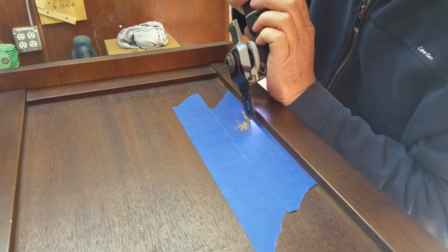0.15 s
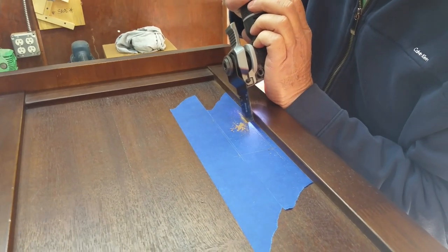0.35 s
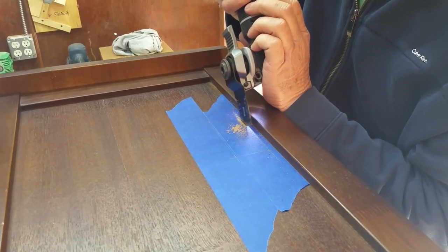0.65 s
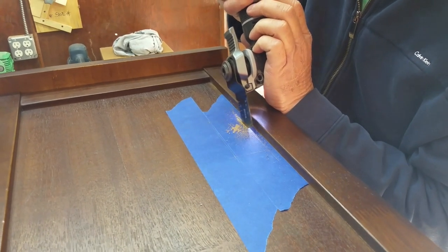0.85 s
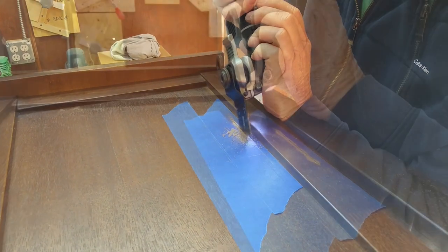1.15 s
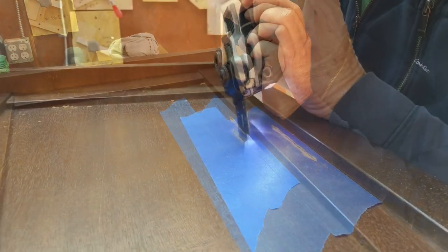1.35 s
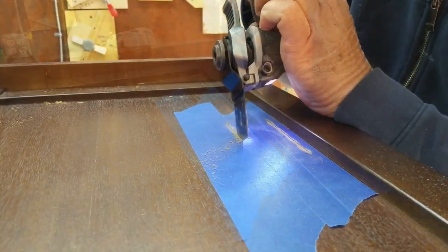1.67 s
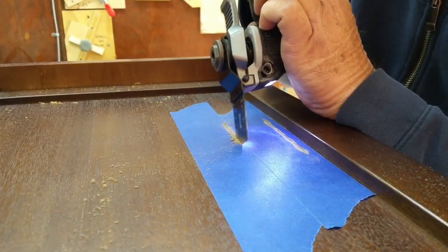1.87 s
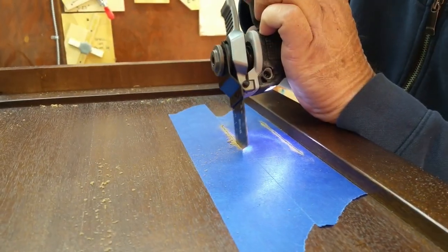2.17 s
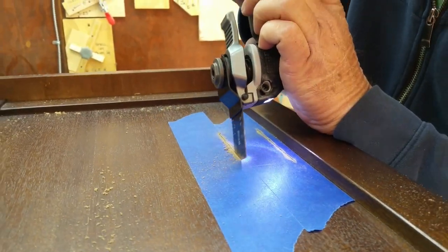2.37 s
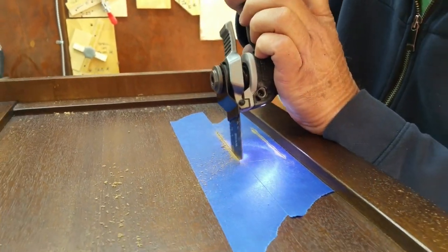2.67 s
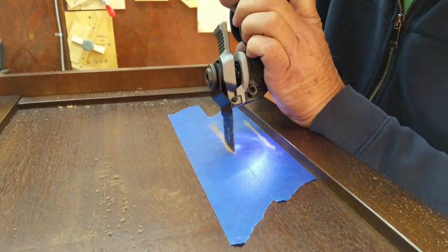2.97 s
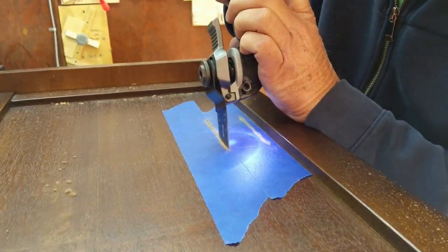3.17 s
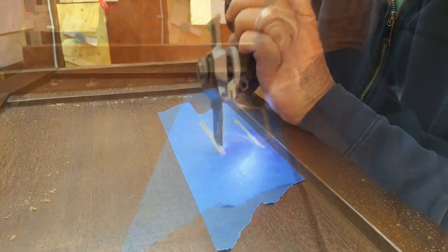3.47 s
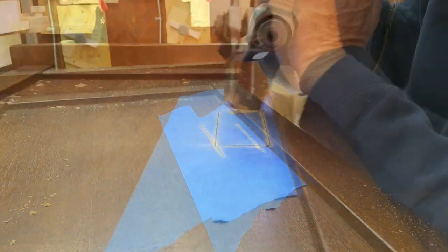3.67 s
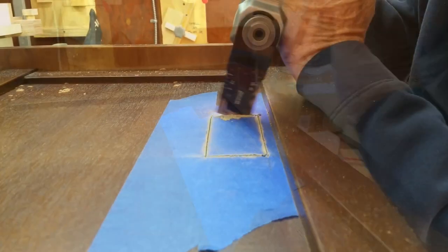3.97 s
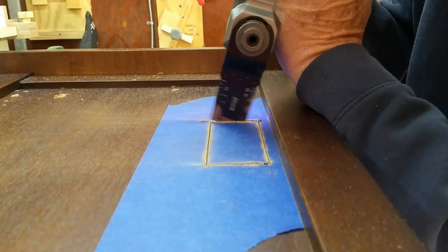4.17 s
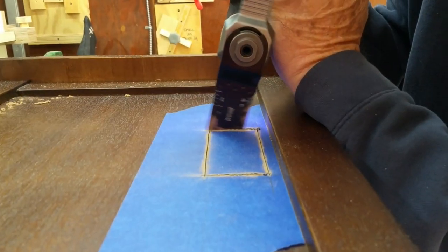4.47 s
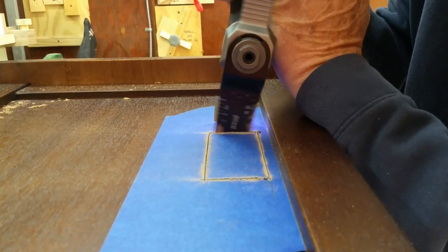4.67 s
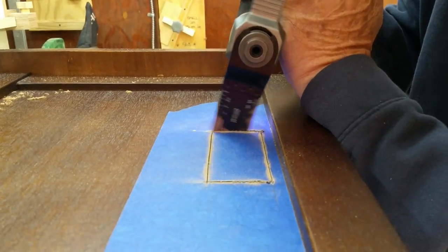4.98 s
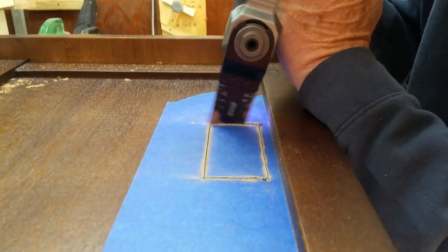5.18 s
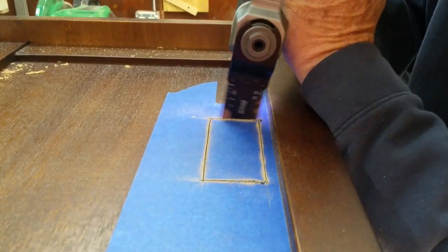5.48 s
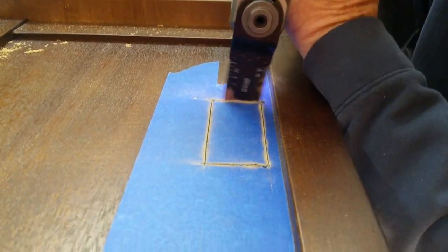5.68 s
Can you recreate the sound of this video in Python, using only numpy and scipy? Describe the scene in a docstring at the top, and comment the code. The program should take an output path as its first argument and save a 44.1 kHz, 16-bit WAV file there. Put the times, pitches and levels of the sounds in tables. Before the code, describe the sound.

A close stereo sound of an oscillating saw cutting a thin veneered wooden panel in a small workshop. From 0 s a shrill, steady buzzing whine with a fast, roughly constant pitch is heard; by about 0.2 s hissing, gritty grinding joins and grows. Between 1 and 1.8 s the first cut fades into a second, with deeper panel hum and stronger rasp. Brief chatter roughens it near 2.1 and 2.7 s, most strongly at 3.1-3.35 s as a harsh rattling buzz. Around 3.4 s the load drops and the whine clears, while a third cut fades in until 4 s. It bites hard, with growling hum, chatter around 3.8-4.2 s and small woody snags at 4.4 and 4.6 s. After 4.65 s the pitch rises slightly and the blade runs freer, a bright wavering whine with light, uneven hiss. It continues to the end, about 5.8 s, without winding down.

```python
"""A shrill, buzzing whine is heard first, then grinding joins: an oscillating saw plunges into a veneered panel
in a small workshop, in three cuts, each fading into the next. About 347 swings a second, two strokes a swing,
make a harmonic series led by even orders; the panel hums the low orders under load. Noise pulsing with the
strokes is the grinding teeth, sidebands are the panel chattering at a rate of its own, and decaying modes
struck by clicks are snags; a low noise band is the panel rumble."""
import sys
import numpy as np
from scipy import signal
from scipy.fft import rfft, irfft, next_fast_len
from scipy.io import wavfile

SR = 44100
rng = np.random.default_rng(int(sys.argv[2]) if len(sys.argv) > 2 else 0)


def to_wav(s):
    """Save 16-bit WAV."""
    ch = np.atleast_2d(s).T  # columns
    pcm = np.round(np.clip(ch, -1, 1) * 32767)  # PCM
    wavfile.write(sys.argv[1], SR, pcm.astype(np.int16))


N = 257103
STEP = 32   # samples between points of a slow control

# Motion and load of the blade in each cut, before the fades; the swing sags and the panel hums as it bites:
# (time [s], swing rate [Hz], order 1 [dB], panel hum in order 2 [dB], blade buzz in order 6 [dB],
# head whine in the even orders from 16 [dB])
CUT_1 = [(0, 350.4, -57.5, -44.5, -36, -30), (.16, 351.2, -56, -51, -38, -32),
         (.25, 349.7, -53, -60.5, -43, -31.5), (.35, 351.8, -49, -55, -43.5, -31),
         (.65, 348.9, -47.5, -44, -32, -25.5), (.76, 346.3, -61, -38.5, -34, -25.5),
         (.85, 347.4, -45.5, -38.5, -32.5, -28.5), (.92, 346.8, -47.5, -35.5, -38.5, -30),
         (1.11, 348, -47.5, -38, -39, -29), (1.26, 347.9, -47.5, -30.5, -43, -27),
         (1.39, 349.3, -45.5, -30.5, -52, -28), (1.52, 350.9, -53, -30.5, -48, -25),
         (1.8, 347.2, -49.5, -28.5, -46, -24)]
CUT_2 = [(1.0, 348.6, -40, -42.5, -50.5, -15.5), (1.28, 345.7, -41.5, -43, -37.5, -24.5),
         (1.422, 346.9, -46, -36.5, -34, -27), (1.531, 346.1, -52, -42, -37, -30),
         (1.75, 342.6, -54, -35, -37.5, -31), (1.86, 344.4, -49, -34, -34.5, -30.5),
         (1.939, 342.9, -55, -32.5, -34, -30), (2.06, 346.6, -48.5, -34, -34.5, -29.5),
         (2.12, 345.6, -51, -34.5, -34.5, -28.5), (2.3, 346, -52, -36.5, -35, -27.5),
         (2.389, 345, -52.5, -40.5, -34, -26.5), (2.54, 347.2, -59.5, -39, -37, -26.5),
         (2.63, 346.4, -51.5, -37.5, -35, -32.5), (2.741, 347.4, -53.5, -32.5, -33, -32),
         (2.83, 346.6, -46, -27.5, -37.5, -30), (2.979, 345.7, -45.5, -28.5, -37.5, -33.5),
         (3.13, 345.9, -45, -33, -42, -31), (3.19, 347, -85, -35, -38, -33),
         (3.289, 345.1, -63, -31.5, -51.5, -35.5), (3.37, 351.8, -58.5, -46.5, -59, -31),
         (3.47, 352.2, -59.5, -49, -51.5, -30.5), (3.53, 348, -83.5, -56.5, -49, -34),
         (3.62, 351.2, -75, -61.5, -51, -26.5), (4.049, 356.9, -61.5, -52.5, -33.5, -27)]
CUT_3 = [(3.3, 340.7, -51, -38, -29, -16.5), (3.549, 335.2, -62, -43, -42.5, -32),
         (3.68, 344.8, -63, -51.5, -35.5, -38.5), (3.759, 341.4, -56.5, -32.5, -30.5, -30.5),
         (3.869, 345, -55.5, -31.5, -37, -29.5), (4.089, 344.4, -60.5, -32.5, -30.5, -34),
         (4.19, 339.9, -44.5, -41.5, -33, -28.5), (4.28, 342.4, -45.5, -37, -34, -31.5),
         (4.35, 339.1, -62, -25.5, -35, -30), (4.41, 335.7, -78, -33, -40, -30),
         (4.501, 339.4, -73.5, -35.5, -44, -30), (4.601, 337.8, -85, -33, -29, -27),
         (4.625, 346.1, -76, -49, -41, -31), (4.66, 351.4, -65.5, -56, -42, -30.5),
         (4.92, 347.3, -71.5, -48, -45, -24.5), (5.04, 350.3, -65.5, -49.5, -42, -30),
         (5.129, 351.7, -75.5, -55, -42, -27.5), (5.29, 348.6, -57, -53, -41, -29),
         (5.409, 352, -69.5, -56, -39.5, -28.5), (5.499, 347.4, -62, -51.5, -45.5, -28.5),
         (5.56, 350.9, -70, -53, -38.5, -26.5), (5.629, 347.6, -67, -47, -44, -25),
         (5.689, 350.8, -67.5, -49, -47, -25.5), (5.83, 345.9, -100.5, -50, -41, -26)]
# Level of the other orders, whichever cut sounds: (time [s], order 4 [dB], order 8 [dB], order 12 [dB],
# orders 10 and 14 [dB], odd orders 3-13 [dB], odd orders 15-45 [dB])
MIDDLE = [(0, -52.5, -29, -44, -47.5, -47, -35), (0.12, -49, -33.5, -51, -40, -46, -35.5),
          (0.3, -44.5, -43.5, -48, -46.5, -49, -33), (0.45, -41.5, -45, -41, -41, -43, -28.5),
          (0.6, -42, -39.5, -41.5, -43.5, -42, -34.5), (0.75, -46, -45.5, -39.5, -40.5, -55.5, -39.5),
          (0.9, -40.5, -37.5, -38.5, -41, -49, -37.5), (1.05, -42.5, -38.5, -38, -37, -46, -30.5),
          (1.23, -45, -34.5, -39.0, -33.5, -39.5, -39.0), (1.4, -42.5, -37, -38, -42.5, -38.5, -39.5),
          (1.55, -40, -34, -39, -37, -43.5, -44.5), (1.75, -45.5, -37.5, -45, -42, -43, -39.5),
          (1.9, -47, -38.5, -40.0, -39.5, -45, -39.5), (2.05, -44.5, -42.5, -42, -42, -43, -36.5),
          (2.2, -44, -45.5, -40, -48.5, -43.5, -36.5), (2.34, -46.5, -36.5, -40.5, -39, -39, -31.5),
          (2.48, -42, -40.5, -42.5, -41.5, -42, -42.5), (2.58, -43.5, -45, -38.5, -43.5, -33.5, -29.5),
          (2.7, -38, -36.5, -39, -37.5, -39.0, -32.5), (2.84, -44, -39.5, -41.5, -37.5, -32.5, -32.0),
          (3, -41.0, -41, -42.5, -39.5, -38, -29.5), (3.13, -34, -37, -38.5, -46, -32.5, -33.5),
          (3.25, -39.5, -40.5, -54.5, -41.5, -50.5, -34), (3.36, -47, -49, -39.5, -43, -52, -41.5),
          (3.45, -46, -44, -44, -44.5, -48.5, -36.5), (3.55, -57.5, -51, -45, -51, -50, -33.5),
          (3.68, -52.0, -50, -49, -38, -43.5, -38), (3.77, -40.5, -39, -47.5, -47, -43.5, -40),
          (3.9, -39, -38.5, -35.5, -42, -48.5, -36.5), (4.06, -37.5, -36.0, -39.5, -43.5, -40, -30),
          (4.14, -39, -36, -40, -41.5, -43.5, -35.5), (4.2, -35.5, -34.5, -38, -38.5, -38.5, -31),
          (4.31, -37, -39, -43, -35, -35, -32), (4.38, -33, -44.5, -29.5, -28.5, -40.5, -34),
          (4.45, -35.0, -39.5, -30.5, -36.5, -62, -36.5), (4.58, -37.5, -39.5, -34, -31.5, -61, -39.5),
          (4.66, -59, -49.5, -48, -42, -44, -39), (4.8, -53.5, -42, -35, -36, -43.5, -34),
          (4.96, -43.5, -37.5, -35, -35, -47, -40.5), (5.05, -67.5, -53, -48, -43, -49, -36.5),
          (5.13, -58.5, -42, -58.5, -43, -43.5, -33.5), (5.22, -51, -44.5, -46.5, -40, -43.5, -38.5),
          (5.3, -40, -35, -40.5, -36, -44, -35.5), (5.38, -49, -37.5, -40.0, -38.5, -42, -34.5),
          (5.45, -57, -51, -34.5, -36.5, -42.5, -32), (5.55, -53.5, -40, -37.5, -35.0, -46, -32.5),
          (5.64, -48, -44, -39.5, -30.5, -48.5, -37), (5.74, -49, -41.5, -48, -34.5, -60.5, -34),
          (5.83, -44, -34.5, -44.5, -31.5, -51.0, -31)]
# Orders sharing each level column, those of the cut first, then those of MIDDLE: [order numbers]
GROUPS = [
    [1],
    [2],
    [6],
    range(16, 46, 2),
    [4],
    [8],
    [12],
    [10, 14],
    range(3, 15, 2),
    range(15, 46, 2),
]
# Colour of head and blade within those groups, one table a cut: (order, relative level [dB])
COLOUR_1 = [(1, -14), (2, -7), (3, -25.5), (4, -9), (5, -31), (6, -2), (7, -23.5), (8, -18), (9, -16),
            (10, -21), (11, -23), (12, -12.5), (13, -26.5), (14, -18.5), (15, -35.5), (16, -5), (17, -18.5),
            (18, 0), (19, -20.5), (20, -1.5), (21, -14), (22, -2), (23, -8.5), (24, -4), (25, -6.5),
            (26, -12.5), (27, -14.5), (28, -12.5), (29, -25), (30, -12.5), (31, -18), (32, -9.5),
            (33, -12.5), (34, -12.5), (35, -17.5), (36, -10.5), (37, -26), (38, -11.5), (39, -22.5),
            (40, -14.5), (41, -26.5), (42, -7), (43, -22), (44, -22.5), (45, -33.5)]
COLOUR_2 = [(1, -17), (2, 0), (3, -23), (4, -10), (5, -17.5), (6, -3), (7, -13.5), (8, -13), (9, -7.5),
            (10, -18.5), (11, -17), (12, -16), (13, -20.5), (14, -21), (15, -13), (16, -8), (17, -21),
            (18, -8.5), (19, -9.5), (20, -2.5), (21, -14.5), (22, -8.5), (23, -10), (24, -5), (25, -10.5),
            (26, -8.5), (27, -16), (28, -9.5), (29, -17), (30, -10.5), (31, -18), (32, -1.5), (33, -23.5),
            (34, -15.5), (35, -20), (36, -15.5), (37, -14), (38, -14.5), (39, -12), (40, -11), (41, -28.5),
            (42, -16.5), (43, -24.5), (44, -13.5), (45, -24.5)]
COLOUR_3 = [(1, -18), (2, 0), (3, -27), (4, -3), (5, -26.5), (6, -1), (7, -22.5), (8, -7.5), (9, -14),
            (10, -9), (11, -24.5), (12, -10), (13, -21), (14, -15.5), (15, -11), (16, -7.5), (17, -19.5),
            (18, -12.5), (19, -7), (20, -6.5), (21, -13.5), (22, -13), (23, -23.5), (24, -13), (25, -7.5),
            (26, -10.5), (27, -13), (28, -12), (29, -10), (30, -17), (31, -13), (32, -13), (33, -14.5),
            (34, -12), (35, -18.5), (36, -23.5), (37, -18.5), (38, -14), (39, -14.5), (40, -9.5), (41, -17),
            (42, -20), (43, -20), (44, -19), (45, -19)]
# Colour once the blade is lifted and runs free: (order, relative level [dB])
COLOUR_FREE = [(1, -29), (2, -15), (3, -27.5), (4, -14), (5, -24.5), (6, -7), (7, -9), (8, -10.5), (9, -10),
               (10, -9), (11, -19), (12, -9.5), (13, -22.5), (14, -5), (15, -18), (16, -1.5), (17, -10.5),
               (18, -2), (19, -9), (20, 1), (21, -13), (22, -6), (23, -22.5), (24, -0.5), (25, -12),
               (26, -5), (27, -17.5), (28, -6), (29, -12.5), (30, -6.5), (31, -9.5), (32, -8), (33, -3),
               (34, -10), (35, -12.5), (36, -9), (37, -17.5), (38, -7.5), (39, -7), (40, -9), (41, -22.5),
               (42, -14), (43, -23), (44, -13), (45, -30.5)]
# When the blade leaves the wood, one entry a cut; a time past the end means never: (time [s])
LIFTED_S = [6, 3.35, 4.63]
# The tool is held differently each time, so some orders lag further at the right microphone (negative: less):
# (order, cut 1 [rad], cut 2 [rad], cut 3 [rad], running free [rad])
HELD = [(8, 1.074, 0.23, -.5, 0.0035), (12, 0.35, -0.41, -3, 2.02), (16, 1.54, 0.82, 1.82, 1.81),
        (18, -0.2, -0.14, -0.2, -2.5), (20, 0.8, -0.9, 0.68, 0.45)]
FREE_ROUGH = 0.55   # share of the flutter left when the blade runs free
# Least share of flutter: order 1 is only the mismatch of the two strokes, which never match for long
FIRST_SHRILL, ODD_SHRILL, EVEN_SHRILL = 0.55, 0.4, 0.33


def cut(rows, orders, number):
    """Harmonic series of a periodic motion: orders locked to one swing phase, roughened by load."""
    span = slice(round(rows[0][0] * SR), min(round(rows[-1][0] * SR), N))
    hz, *levels = [column[span] for column in in_time(rows)]
    size, mean_hz = len(hz), hz.mean()
    hunting_hz = 0.2386 * fill(drift(18.36, size), size)   # the motor hunts slightly
    turn = 2 * np.pi * np.cumsum(hz + hunting_hz) / SR
    # the hum of the panel tells how hard the blade bites
    load = np.clip((levels[1] + 58) / 22, FREE_ROUGH, 1)
    # strokes land early or late: skirts on high orders
    turn = turn + 0.011 * load * fill(drift(70, size), size)

    levels += [column[span] for column in in_time(MIDDLE)]
    slow_s = np.arange(span.start, span.stop)[::STEP] / SR
    lifted = np.clip((slow_s - LIFTED_S[number]) / 0.03, 0, 1)
    colour = {k: biting + (free - biting) * lifted
              for (k, biting), (_, free) in zip(orders, COLOUR_FREE)}
    line_db = {}
    for group, level_db in zip(GROUPS, levels):
        # power sum of the colour, so that it only shares out the group level
        total_db = 10 * np.log10(sum(from_db(colour[k]) ** 2 for k in group))
        for k in group:
            line_db[k] = level_db + fill(colour[k] - total_db, size)

    lifted = np.pad(lifted, (0, 2), "edge")[:size // STEP + 2]
    trails = {round(k): held[number] + (held[3] - held[number]) * lifted for k, *held in HELD}
    lines, swing, carrier = np.zeros((2, size)), np.exp(1j * turn), 1
    for k in sorted(line_db):
        carrier = carrier * swing   # one order higher
        if k % 2:
            least = ODD_SHRILL if k > 1 else FIRST_SHRILL
            lines += partial(carrier, k * mean_hz, line_db[k], wander_db=1.8, flutter_db=2.8,
                             wander_rad=0.6, load=load, least=least)
        else:
            lines += partial(carrier, k * mean_hz, line_db[k], wander_db=1.18, flutter_db=3.0,
                             wander_rad=0.666, load=load, least=EVEN_SHRILL, trail=trails.get(k, 0))
    for bout in CHATTER:
        # a bout belongs to the cut begun last
        if sum(later[0][0] < bout[0] for later in (CUT_2, CUT_3)) == number:
            lines += chatter_lines(bout, turn, span, mean_hz)
    return np.pad(lines, ((0, 0), (span.start, N - span.stop)))


# Level difference of the two microphones: (frequency [Hz], left minus right [dB])
BALANCE_DB = [(60, -13), (200, 5.5), (380, 1), (700, 1.5), (1290, 3.5), (2380, 1.5), (4400, 0.5), (8120, 0),
              (15000, -4.5)]
# Likeness of the two microphones: (frequency [Hz], left-right likeness [0-1])
LIKENESS = [(60, 1), (300, 0.994), (900, 0.876), (2000, 0.75), (5000, 0.201), (15000, 0.483)]
BLUR_FROM_HZ, BLUR_RAD_PER_KHZ = 8000, 0.11   # above this the lines smear ever more into rasp


def partial(carrier, hz, level_db, wander_db, flutter_db, wander_rad, load, least=0, trail=0):
    """Amplitude and phase modulation: slow chance broadens a line, partly apart at two microphones."""
    n = len(carrier)
    apart = np.sqrt(max(1 - at_hz(LIKENESS, hz), 0))
    shrill = max(min(hz / 4000, 1) ** 0.8, least)   # higher lines waver more
    level_db, load = [np.pad(c[::STEP], (0, 2), "edge")[:n // STEP + 2] for c in (level_db, load)]
    left_right = np.array([[0.5], [-0.5]])

    level_db = level_db + shrill * (wander_db * drift(11.55, n) + flutter_db * load * drift(53.8, n))
    level_db = level_db + left_right * (at_hz(BALANCE_DB, hz) + 2.45 * apart * drift(2.23, n))
    shift = rng.uniform(0, 2 * np.pi) + wander_rad * shrill * load * drift(24.5, n)
    shift = shift + left_right * (trail + apart * drift(2.433, n))
    blur_rad = BLUR_RAD_PER_KHZ * max(hz - BLUR_FROM_HZ, 0) / 1000 * load
    shift = shift + blur_rad * (drift(90, n) + [[0.6], [-0.6]] * drift(90, n))
    gains = np.sqrt(2) * from_db(level_db) * np.exp(1j * shift)   # a line at 0 dB has unit RMS
    return [(fill(gain, n) * carrier).imag for gain in gains]


# Bouts of panel chatter: (start [s], swell [s], hold [s], bounce rate [Hz], top level [dB])
CHATTER = [(2.04, 0.0874, 0.01574, 190.5, -55.5), (2.644, 0.0478, .01, 186.9, -51),
           (3.121, 0.0693, 0.1393, 190.1, -42.5), (3.749, 0.392, 0.0504, 311, -48)]
# Lines beside each even order: (multiple of the bounce rate, relative level [dB])
CHATTER_SIDES = [(-3, -11), (-2, -17.5), (-1, -3.5), (1, 3.5), (2, -10), (3, -16.5)]
# Colour of the chatter lines: (frequency [Hz], relative level [dB])
CHATTER_COLOUR = [(150, -31), (200, -23), (300, -10), (500, -1), (900, -1), (1600, -3), (3000, -1),
                  (6000, -14), (16000, -22)]
CHATTER_STOP_S = 0.045   # closing fall of each bout


def chatter_lines(bout, turn, span, swing_hz):
    """Intermodulation: a panel bouncing at its own rate sets sum and difference tones by the even orders."""
    s, swell_s, hold_s, rate_hz, top_db = bout
    corner_s = s + np.cumsum([0, swell_s, hold_s, CHATTER_STOP_S])
    corner_db = top_db + np.array([-11.16, -2.61, 0, -45])
    level_db, = in_time(np.transpose([corner_s, corner_db]))
    on = np.arange(round(s * SR), round((s + swell_s + hold_s + CHATTER_STOP_S) * SR))
    size, in_cut = len(on), on - span.start
    bounce = 2 * np.pi * np.cumsum(rate_hz + 3.12 * fill(drift(28.7, size), size)) / SR
    onset = np.minimum(np.arange(size) / (0.01 * SR), 1)
    out = np.zeros((2, len(turn)))
    for k in range(0, 24, 2):
        for side, side_db in CHATTER_SIDES:
            hz = k * swing_hz + round(side) * rate_hz
            if hz > 100:
                line_db = level_db[on] + side_db + at_hz(CHATTER_COLOUR, hz)
                carrier = onset * np.exp(1j * (k * turn[in_cut] + round(side) * bounce))
                out[:, in_cut] += partial(carrier, hz, line_db, wander_db=0.5, flutter_db=2,
                                          wander_rad=0.6, load=np.ones(size))
    return out


# Blade snags and jumps: (time [s], strength before the mode levels [dB])
SNAGS = [(4.373, -52), (4.606, -45)]
# Modes of the panel: (frequency [Hz], relative level [dB], decay time to -60 dB [s])
PANEL = [(367.3, -11, 0.12), (710.6, 8.5, 0.044), (1103, -19.5, 0.017), (1608.5, -3.5, 0.0594),
         (2080, 15, 0.0228), (2795, 14, 0.024)]


def snags():
    """Modal ringing: click clusters excite damped two-pole resonators; the thin panel gives no bass."""
    out = np.zeros(N)
    for hz, mode_db, t60 in PANEL:
        clicks = np.full(N, 1e-18)
        for s, strength_db in SNAGS:
            places = round(s * SR) + rng.integers(0, 550, 12)
            clicks[places] = from_db(strength_db + mode_db - 6) * rng.normal(0, 1, 12)
        r, w = from_db(-60 / (t60 * SR)), 2 * np.pi * hz / SR   # pole radius and angle
        out += signal.lfilter([0, np.sin(w)], [1, -2 * r * np.cos(w), r * r], clicks)
    return signal.sosfilt(signal.butter(4, 300, "high", fs=SR, output="sos"), out)


# Teeth grinding: (time [s], rasp [dB], hiss [dB])
GRIND = [(0, -64.5, -61.5), (.19, -57.5, -38), (.34, -57, -41), (.55, -51.5, -32), (.74, -54, -41),
         (.99, -52, -34.5), (1.1, -51.5, -39), (1.73, -48, -37), (2.12, -47, -40), (2.56, -48, -36.5),
         (2.69, -50.5, -35.5), (2.93, -54, -38), (3.1, -52.5, -35.5), (3.32, -46, -40), (3.38, -52, -59.5),
         (3.48, -65.5, -50), (3.53, -48, -39), (3.58, -72.5, -52), (3.7, -59, -36.5), (3.8, -60, -45),
         (4.1, -51.5, -33), (4.4, -52, -41.5), (4.61, -62, -36), (4.68, -60.5, -38), (4.78, -70.5, -62),
         (4.96, -66, -56.5), (5.03, -56.5, -45), (5.2, -58.5, -46), (5.4, -58, -40.5), (5.68, -54, -38.5),
         (5.83, -78, -35)]
# Level of the upper rasp: (time [s], level [dB])
UPPER_RASP = [(0, -61.5), (.3, -59), (.5, -57), (.7, -49.5), (.9, -46.5), (1.1, -62), (1.5, -59.5),
              (1.7, -43), (1.9, -49), (2.1, -46.5), (2.55, -48.5), (2.69, -46), (2.852, -47.5), (3.1, -52),
              (3.18, -38), (3.32, -44.5), (3.38, -61), (3.48, -63), (3.531, -48.5), (3.6, -64),
              (3.8, -49.5), (4.099, -51), (4.3, -49.5), (4.5, -42.5), (4.611, -54), (4.68, -85),
              (4.96, -84), (5.03, -59.5), (5.12, -81.5), (5.45, -86), (5.83, -70)]
# Edges of the rumble, rasp, upper rasp and hiss bands: (frequency [Hz])
BAND_EDGES_HZ = [120, 600, 2300, 5000, 16500]


def grind():
    """Amplitude-modulated noise: teeth tear fibres in three bands that pulse with the strokes."""
    count = swings()
    torn = at_microphones(tearing(count))
    strokes = 1 + 0.5 * np.cos(2 * np.pi * count) + 0.89 * np.cos(4 * np.pi * count)
    pulse = strokes * rattle()
    rasp_db, hiss_db = in_time(GRIND)
    upper_db, = in_time(UPPER_RASP)
    out = np.zeros((2, N))
    for low, high, level_db in zip(BAND_EDGES_HZ[1:], BAND_EDGES_HZ[2:], (rasp_db, upper_db, hiss_db)):
        out += pulse * noise_band(torn, low, high, level_db, low_power=20)
    # high-pass: keep low by-products of the pulsing out of the grinding
    return signal.sosfilt(signal.butter(4, 250, "high", fs=SR, output="sos"), out)


SWING_MEMORY = 0.7   # share of the tearing noise that the next swing repeats, unless the panel chatters


def tearing(count):
    """Correlated noise: each swing partly repeats the last, so two noises gather round the orders."""
    rows, size = int(count[-1]) + 2, 384   # one row a swing
    fresh = irfft(rfft(rng.standard_normal((rows, 2, 96))), size)   # smooth interpolation
    memory = SWING_MEMORY * (1 - np.interp(np.arange(rows), count, chatter_depth().max(axis=0)))
    for i in range(1, rows):
        fresh[i] = memory[i] * fresh[i - 1] + np.sqrt(1 - memory[i] ** 2) * fresh[i]
    return np.array([np.interp(count * size, np.arange(rows * size), fresh[:, k].ravel()) for k in (0, 1)])


def swings():
    """Phase as the integral of frequency: swings at the old cut's speed until its fade is half done, then the new."""
    second, third = fades()
    speeds = [in_time(rows)[0] for rows in (CUT_1, CUT_2, CUT_3)]
    first_two = np.where(second > 0.5, speeds[1], speeds[0])
    return np.cumsum(np.where(third > 0.5, speeds[2], first_two)) / SR


def rattle():
    """Periodic gating: a gain chops the grinding at the bounce rate while the panel chatters."""
    rates_hz = np.array(CHATTER)[:, 3:4]
    return 1 + np.sum(chatter_depth() * np.cos(2 * np.pi * rates_hz * np.arange(N) / SR), axis=0)


RATTLE_FULL_DB = -46   # chatter this loud chops the grinding fully into bounces


def chatter_depth():
    """Modulation depth: how hard each bout shakes the blade, 0-1, one row a bout."""
    depths = []
    for s, swell_s, hold_s, _, top_db in CHATTER:
        corner_s = s + np.cumsum([0, swell_s, hold_s, CHATTER_STOP_S])
        shape = np.interp(np.arange(N) / SR, corner_s, [0, 1, 1, 0])
        depths.append(min(from_db(top_db - RATTLE_FULL_DB), 1) * shape)
    return np.array(depths)


RUMBLE_DB, RUMBLE_FOLLOWS = -73.5, 0.05   # level at the mean rasp; share of the rasp's swing in dB


def rumble():
    """Band-limited noise: a low panel rumble with small random surges, unpulsed by the strokes."""
    plain = at_microphones(rng.standard_normal((2, N)))
    rasp_db = in_time(GRIND)[0]
    level_db = RUMBLE_DB + RUMBLE_FOLLOWS * (rasp_db - rasp_db.mean())
    return noise_band(plain, BAND_EDGES_HZ[0], BAND_EDGES_HZ[1], level_db, low_power=4)


# Colour of the noise; it gathers in the ringing bands of the blade: (frequency [Hz], relative level [dB])
GRIND_COLOUR = [(25, -17), (120, -7.5), (300, -5), (600, 0.5), (650, -1), (1000, -12.5), (1750, 15),
                (2300, 1), (3150, 1), (4500, 1), (5300, -3.5), (6600, -1), (7400, -3), (8300, -1),
                (10000, -5), (11500, -6), (13200, -5), (14500, -4), (16000, -7)]


def at_microphones(noises):
    """Partial coherence: a mid and a side noise give coloured left and right spectra."""
    size = next_fast_len(N)
    hz = np.fft.rfftfreq(size, 1 / SR)
    mid, side = rfft(noises, size)
    alike = at_hz(LIKENESS, hz) - 0.15   # noise is less alike than the lines
    colour = from_db(at_hz(GRIND_COLOUR, hz) + [[0.5], [-0.5]] * at_hz(BALANCE_DB, hz))
    return colour * (np.sqrt(1 + alike) * mid + [[1], [-1]] * np.sqrt(1 - alike) * side)


def noise_band(spectrum, low, high, level_db, low_power):
    """Band-pass filtering: one band at unit spread, then set to a level that surges at random."""
    size = next_fast_len(N)
    hz = np.fft.rfftfreq(size, 1 / SR)
    level_db = level_db + fill(1.8 * drift(10.0, N) + 1.2 * drift(30, N), N)
    shape = 1 / np.sqrt(1 + (hz / high) ** 12) / np.sqrt(1 + (low / (hz + 1)) ** low_power)
    band = irfft(spectrum * shape, size)[:, :N]
    return band / band.std() * from_db(level_db)


def from_db(db):
    """Logarithmic level: decibels to amplitude gain."""
    return 10 ** (np.asarray(db) / 20)


def in_time(rows):
    """Linear interpolation: columns of a table joined by straight lines, one value a sample."""
    s, *columns = np.transpose(rows)
    return [np.interp(np.arange(N) / SR, s, c) for c in columns]


def at_hz(points, hz):
    """Logarithmic pitch scale: a spectrum read between its points on a log-frequency axis."""
    f, v = np.transpose(points)
    return np.interp(np.log(np.maximum(hz, 1)), np.log(np.maximum(f, 1)), v)


def drift(rate, size):
    """Low-passed noise of spread 1, a value every STEP samples; three poles keep gaps between lines clear."""
    r = np.exp(-2.6 * np.pi * STEP * rate / SR)
    noise = rng.standard_normal(size // STEP + 1002)
    slow = signal.lfilter([1], np.poly([r, r, r]), noise)[1000:]   # drop the settling
    return slow / slow.std()


def fill(slow, size):
    """Linear upsampling: from one value every STEP samples to one a sample."""
    return np.interp(np.arange(size) / STEP, np.arange(len(slow)), slow)


def fades():
    """Linear crossfade: share of the second and of the third cut as they fade in."""
    t = np.arange(N) / SR
    pairs = (CUT_1, CUT_2), (CUT_2, CUT_3)
    return [np.clip((t - new[0][0]) / (old[-1][0] - new[0][0]), 0, 1) for old, new in pairs]


def scene():
    """Superposition: three crossfaded cuts, the snags, the grinding and the rumble add."""
    second, third = fades()
    saw = (1 - second) * cut(CUT_1, COLOUR_1, number=0)
    saw = saw + second * (1 - third) * cut(CUT_2, COLOUR_2, number=1)
    saw = saw + third * cut(CUT_3, COLOUR_3, number=2)
    return saw + snags() + grind() + rumble()


# Phase by which the right microphone trails the left: (frequency [Hz], lag [rad])
RIGHT_TRAILS = [(60, -1), (700, .5), (1400, 0.6385), (2080, 0.6574), (2770, 1.1229), (3470, 4), (4160, 5),
                (4860, 4.5), (5550, 5.5), (6250, 7.5), (6940, 7.5), (7630, 8), (8330, 9.5), (9020, 10.5),
                (9720, 12), (10400, 13), (11100, 15.5), (11800, 17), (12500, 17.5), (16000, 26.5)]
CUTOFF_HZ = 15850


def record(dry):
    """Interchannel phase: the right microphone trails by a lag set by frequency; a low-pass cuts the top."""
    size = next_fast_len(N)
    lag = at_hz(RIGHT_TRAILS, np.fft.rfftfreq(size, 1 / SR))
    right = irfft(rfft(dry[1], size) * np.exp(-1j * lag), size)[:N]
    top_cut = signal.ellip(12, 0.5, 70, CUTOFF_HZ, fs=SR, output="sos")
    return signal.sosfilt(top_cut, [dry[0], right])


dry = scene()
out = record(dry)
to_wav(out)
```